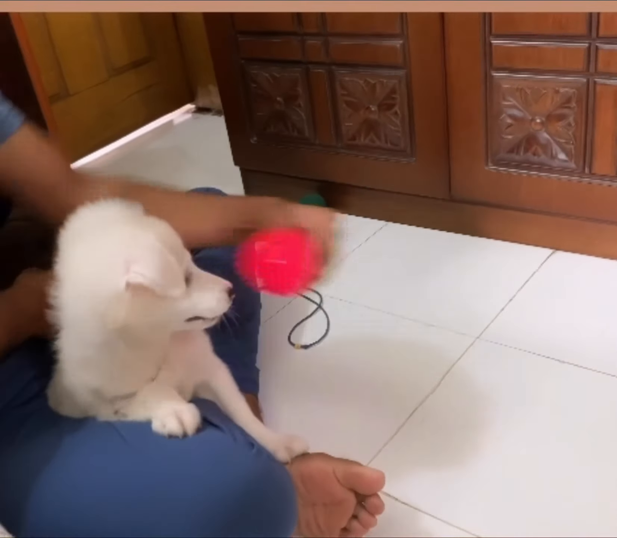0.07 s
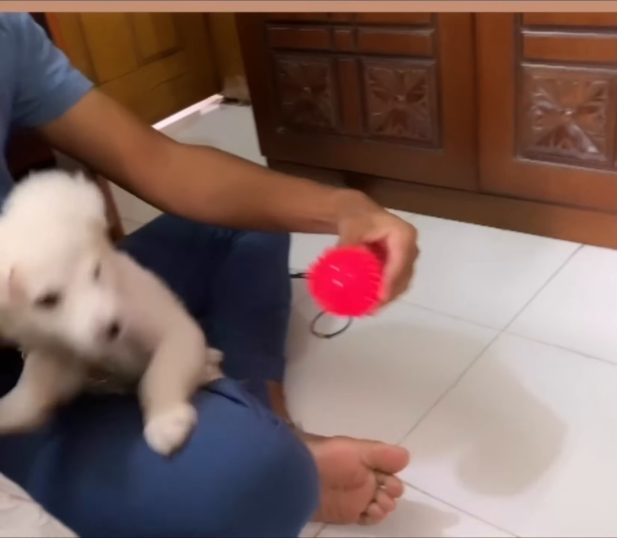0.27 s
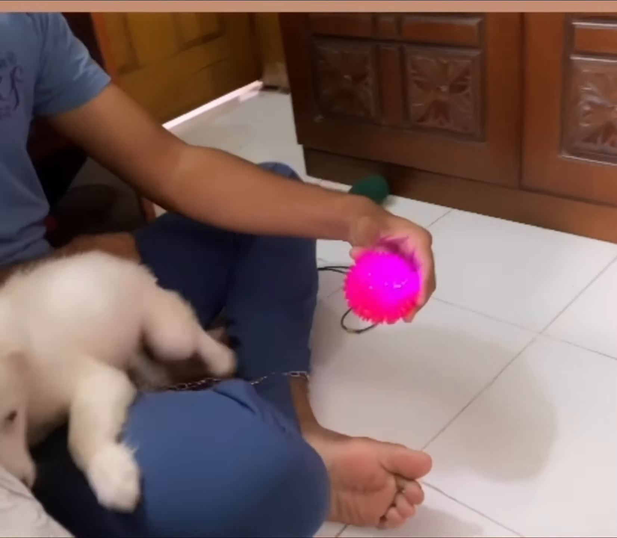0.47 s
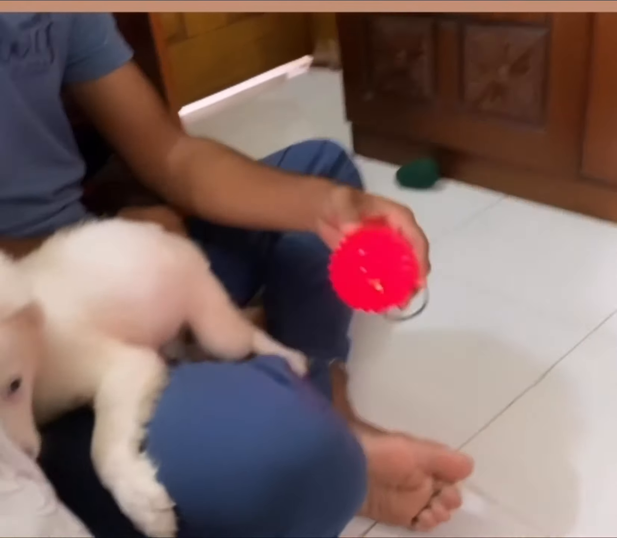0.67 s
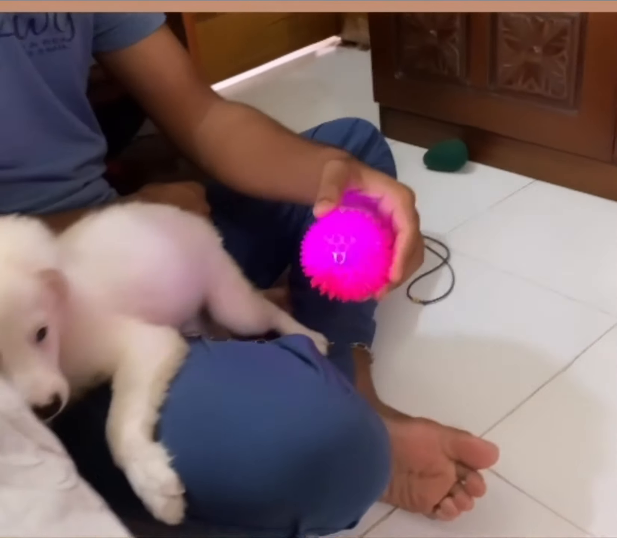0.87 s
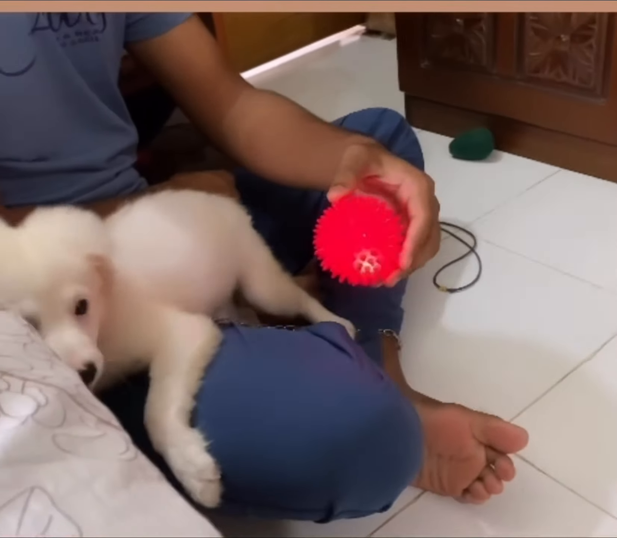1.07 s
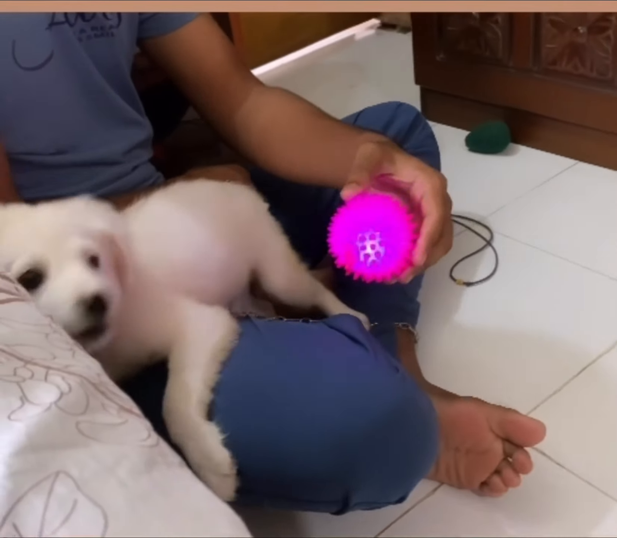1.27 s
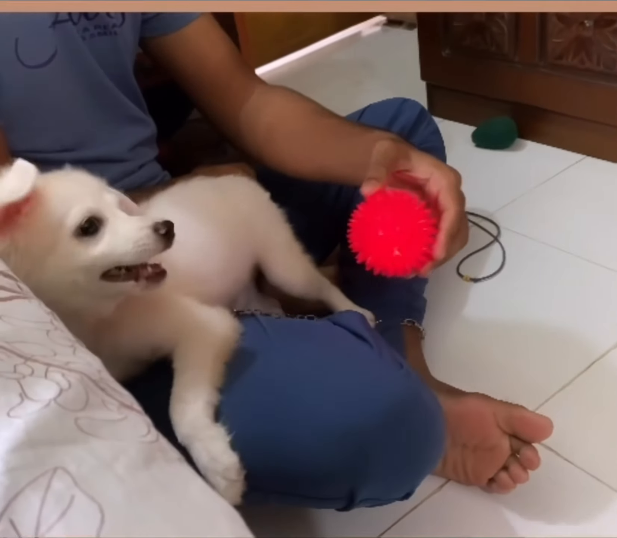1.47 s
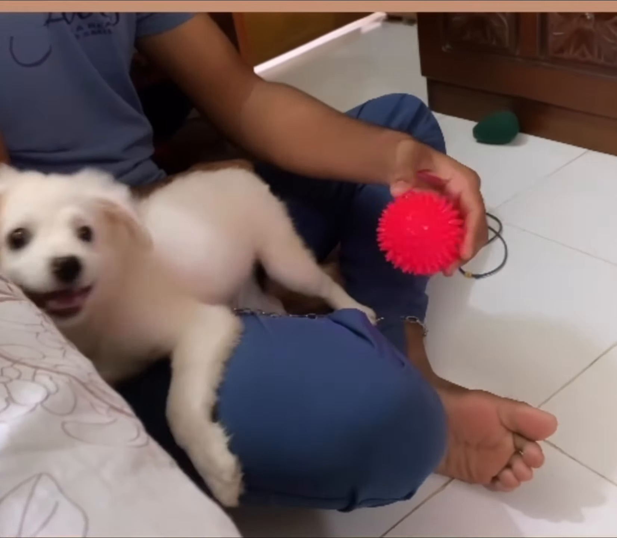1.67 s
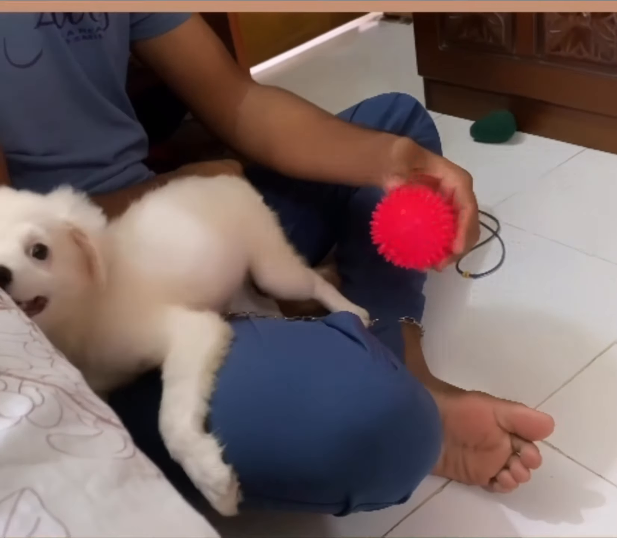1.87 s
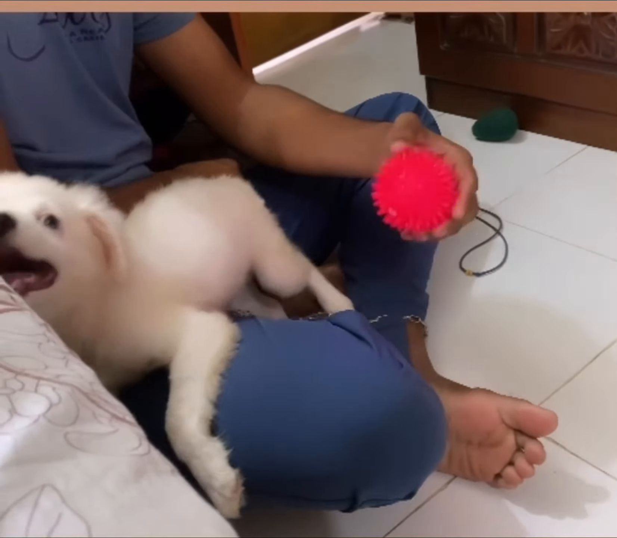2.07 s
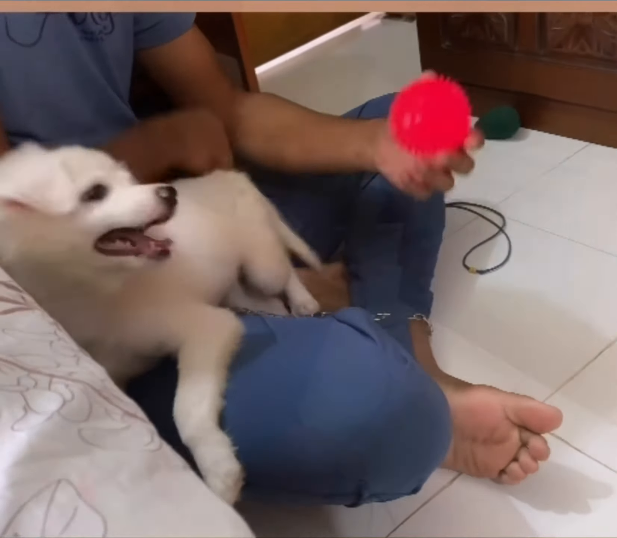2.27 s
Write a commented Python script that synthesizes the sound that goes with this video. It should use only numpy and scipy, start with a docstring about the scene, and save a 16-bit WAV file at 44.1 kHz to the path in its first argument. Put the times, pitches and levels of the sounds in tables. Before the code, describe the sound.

A rubber squeaky ball squeaks twice, high on the squeeze, then lower and rougher refilling

```python
"""Two squeaks of a rubber toy ball, close by in a quiet tiled room: high on each squeeze, then lower and
rougher as the ball refills. The first squeeze starts with a soft thump over a faint room rumble.
Each squeak is a sum of gliding reed overtones plus pulsing air noise; the thump is a short low cosine.
Decaying noise makes the echoes, coloured noise the rumble; the recorder's gain dips under the squeaks."""
import sys
import numpy as np
from scipy import signal
from scipy.fft import rfft, irfft, next_fast_len
from scipy.io import wavfile
from scipy.ndimage import uniform_filter1d, minimum_filter1d, map_coordinates

SR = 44100
rng = np.random.default_rng(int(sys.argv[2]) if len(sys.argv) > 2 else 0)


def store_pcm(level_fs):
    """Save levels as 16-bit WAV."""
    pcm = np.round(np.clip(level_fs, -1, 1) * 32767).astype(np.int16)
    wavfile.write(sys.argv[1], SR, np.atleast_2d(pcm).T)


N = 101430  # samples, 2.3 s


def amp(db):
    """Decibels to gain."""
    return 10 ** (np.asarray(db) / 20)


def unit(x):
    """Scale to rms 1."""
    return x / np.sqrt(np.mean(x ** 2) + 1e-20)


def along(points, hz):
    """Read (f/Hz, value) points on a log frequency axis."""
    f, v = np.transpose(points)
    return np.interp(np.log(hz + 1), np.log(f + 1), v)


def wobble(rate):
    """A smooth random curve with rate knots a second."""
    knots = rng.standard_normal(int(N * rate / SR) + 4)
    return map_coordinates(knots, [np.arange(N) * rate / SR])


def filtered(x, response):
    """Shape x by a gain for each frequency."""
    m = next_fast_len(N + SR // 2)  # padded so that the filter does not wrap round
    gain = response(np.fft.rfftfreq(m, 1 / SR))
    return irfft(rfft(x, m) * gain, m)[:N]


def noise(spectrum):
    """Noise of rms 1, coloured by (f/Hz, level/dB) points."""
    return unit(filtered(rng.standard_normal(N), lambda hz: amp(along(spectrum, hz))))


def room_rumble():
    """The faint steady sound of the room: noise weighted to the lows."""
    # Spectrum of the quiet room: f/Hz, relative level per Hz/dB
    rumble_spectrum = [(15, -34), (25, -9), (64, 0.5), (120, -8.5), (149, -5), (180, -5.5), (249, -6),
                       (335, -9.5), (503, -15.5), (560, -24), (677, -18.5), (1160, -23), (2000, -31.5),
                       (4140, -39), (5730, -53), (9570, -56), (16000, -68.5)]
    return amp(-27.5) * noise(rumble_spectrum)


def thump():
    """One soft low push as the hand closes on the ball: a cosine that swells and dies exponentially."""
    peak_s, pitch_hz, level_db = .2485, 70, -7
    width_s = .003  # time constant on either side of the peak
    t = np.arange(N) / SR - peak_s
    return amp(level_db) * np.exp(-np.abs(t) / width_s) * np.cos(2 * np.pi * pitch_hz * t)


def squeak(rows, colour, gain_db, jitter, shimmer_db, air_db, count=22):
    """Reed overtones glide through fixed pipe resonances and dull with the flow; air hisses once a cycle."""
    # Hiss of air through the reed: f/Hz, relative level/dB
    air_spectrum = [(300, -17), (800, -4), (1700, -2), (2700, -0.5), (4500, -5), (5900, -11.5),
                    (7000, -2.5), (8200, 0.5), (10000, -7.5), (13000, -19), (16000, -19)]
    attack_s, release_s = 0.0018, 0.0017
    chiff_db, chiff_s = 0.5, .0016  # burst of air before the reed settles, relative to the reed
    full_db, dulling = -11.5, .25  # below full_db overtones fade: dB per octave for each dB less
    flutter_hz = 8100  # overtones flutter by about shimmer_db here, less below and more above
    phase_scatter = 1.3  # radians; the overtones stay partly in step

    s, pitch_hz, level_db = np.transpose(rows)
    clock = np.arange(N) / SR
    on = (clock > s[0]) & (clock < s[-1] + 10 * release_s)
    t = clock[on]
    hz = np.interp(t, s, pitch_hz) * (1 + jitter * wobble(500)[on])
    flow_db = np.interp(t, s, level_db)
    phase = 2 * np.pi * np.cumsum(hz) / SR

    k = np.arange(1, count + 1)[:, None]  # overtone numbers, 1 is the reed pitch
    flutter = np.array([wobble(90)[on] for _ in k])
    flutter_db = shimmer_db * k * hz / flutter_hz * flutter
    weights = amp(along(colour, k * hz) + flutter_db)
    weights = weights * (k * hz < SR / 2)
    weights = weights / np.sqrt(np.sum(weights ** 2, axis=0) / 2)  # even loudness before dulling
    weights = weights * amp(dulling * np.minimum(flow_db - full_db, 0) * np.log2(k))
    offsets = phase_scatter * rng.standard_normal(k.shape)
    reed = np.sum(weights * np.sin(k * phase + offsets), axis=0)

    air_level = amp(air_db) + amp(chiff_db) * np.exp(-(t - s[0]) / chiff_s)
    air = noise(air_spectrum)[on] * (1 + np.cos(phase)) * air_level
    attack = np.minimum((t - s[0]) / attack_s, 1)
    release = np.exp(-np.maximum(t - s[-1], 0) / release_s)
    out = np.zeros(N)
    out[on] = amp(flow_db + gain_db) * attack * release * (reed + air)
    return out


def squeezes():
    """Clean high squeaks as the air is pushed out through the reed."""
    # One flow curve per squeeze: t/s, reed pitch f/Hz, level before gain_db/dB
    push_curves = [
        [(0.2508, 820, -13), (0.2525, 1031, -2.5), (0.265, 1128, -13), (0.276, 1140, -8.5), (0.326, 1171, -9.5),
         (0.344, 1121, -11), (0.36, 1046, -10), (0.372, 975, -20.5)],
        [(1.8202, 803, -13.5), (1.822, 1042, -5), (1.833, 1121, -14.5), (1.842, 1144, -9), (1.864, 1137, -9.5),
         (1.882, 1096, -9.5), (1.896, 1027, -14.5), (1.907, 950, -23)],
    ]
    # Overtone strength with the air flowing out: f/Hz, relative level/dB
    out_colour = [(1000, -6.5), (1150, -6.5), (2100, -9), (2320, -7), (3300, -7), (4200, -12.5),
                  (4620, -2.5), (5250, -7), (5950, -17), (6800, -3), (7500, 3), (8100, -3.5), (9000, -6),
                  (9500, -19), (10300, -18), (11500, -28), (12400, -27.5), (13000, -34), (13750, -32.5),
                  (15700, -42.5)]
    return sum(squeak(rows, out_colour, gain_db=7.5, jitter=.0007, shimmer_db=0.35, air_db=-47)
               for rows in push_curves)


def refills():
    """Lower, rougher and airier squeaks as the ball draws air back in through the reed."""
    # One flow curve per refill: t/s, reed pitch f/Hz, level before gain_db/dB
    draw_curves = [
        [(0.4055, 815, -21), (0.412, 810, -4), (0.421, 842, -9.5), (0.441, 932, -10), (0.455, 919, -12.5),
         (0.475, 866, -12), (0.49, 793, -14), (0.505, 749, -14.5), (0.522, 678, -28)],
        [(1.948, 792, -21.5), (1.954, 811.5, -8), (1.962, 832.4, -10.5), (1.971, 832, -8.5),
         (1.988, 790, -14.5), (2.001, 765, -15), (2.013, 744.4, -15.5), (2.028, 686, -26)],
    ]
    # Overtone strength with the air flowing in: f/Hz, relative level/dB
    in_colour = [(700, -10), (820, -2.5), (1450, -16.5), (1640, -7.5), (2200, -16.5), (2480, -9),
                 (3200, -11), (4200, -17.5), (4650, -13.5), (5350, -16.5), (5800, -38), (6250, -33),
                 (6700, -18.5), (7500, -4), (8300, -6), (9500, -15), (10000, -14), (10700, -25),
                 (12300, -26.5), (13300, -36), (15700, -34)]
    return sum(squeak(rows, in_colour, gain_db=6.0, jitter=.0035, shimmer_db=2.8, air_db=-29)
               for rows in draw_curves)


def echo(x, t60, colour):
    """A diffuse decay: noise dying at (f/Hz, T60/s) rates, coloured by (f/Hz, level/dB) points."""
    hz, t, z = signal.stft(rng.standard_normal(SR), SR, nperseg=256)
    decay = amp(-60 * t / along(t60, hz)[:, None])
    tail = signal.istft(z * decay, SR, nperseg=256)[1]
    wet = signal.fftconvolve(x, tail / np.linalg.norm(tail))[:N]
    return filtered(wet, lambda f: amp(along(colour, f)))


def room(x):
    """Bright early reflections from tiles and furniture, with the room's longer tail."""
    # Colour of the early reflections: f/Hz, level/dB
    walls_colour = [(700, -10.5), (4000, -4.5), (7000, -1.5), (10000, 2), (15000, 1)]
    # Decay of the long tail: f/Hz, T60/s
    tail_t60 = [(500, 1), (3000, 0.52), (8000, 0.42), (14000, 0.12)]
    # Colour of the long tail: f/Hz, level/dB
    tail_colour = [(700, -7.5), (3000, -3.5), (4700, -9), (6000, -4), (6800, -3), (7800, -3), (9000, 3),
                   (10800, 6), (12300, -4.5), (15000, -7.5)]
    walls = amp(-16) * echo(x, [(1000, .16)], walls_colour)  # T60 of 0.16 s at all frequencies
    tail = amp(-24) * echo(x, tail_t60, tail_colour)
    return walls + tail


def ducked(x, threshold_db, slope, fall_db_per_s):
    """Cut slope dB per dB of held level above the threshold; the held level jumps up, then falls steadily."""
    power = np.abs(uniform_filter1d(x ** 2, size=160))
    level_db = 10 * np.log10(power + 1e-12)
    fall = fall_db_per_s * np.arange(N) / SR
    held_db = np.maximum.accumulate(level_db + fall) - fall
    return x * amp(-slope * np.maximum(held_db - threshold_db, 0))


def scene():
    """The ball and its echo over the steady room rumble, the same in both channels."""
    toy = squeezes() + refills()
    mono = room_rumble() + thump() + toy + room(toy)
    return np.array([mono, mono])


def record(dry):
    """Slow gain control, then a fast one; peaks are held to full scale and the top is cut off."""
    x = ducked(dry.mean(axis=0), threshold_db=-17, slope=0.16, fall_db_per_s=13.5)
    x = ducked(x, threshold_db=-14, slope=0.48, fall_db_per_s=353)
    peak_gain = minimum_filter1d(1 / np.maximum(np.abs(x), 1), size=200)
    x = x * uniform_filter1d(peak_gain, size=200)
    top_hz = 15800
    x = filtered(x, lambda hz: 1 / (1 + (hz / top_hz) ** 200))
    return np.array([x, x])


dry = scene()
out = record(dry)
store_pcm(out)
```